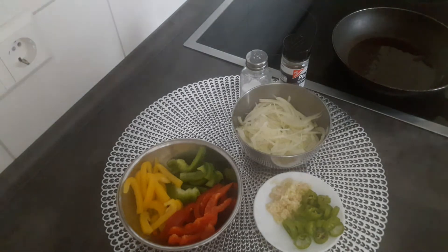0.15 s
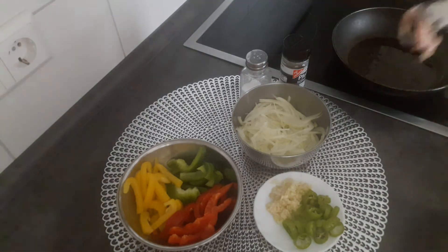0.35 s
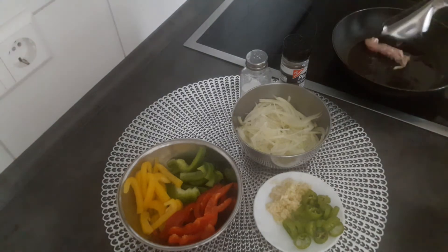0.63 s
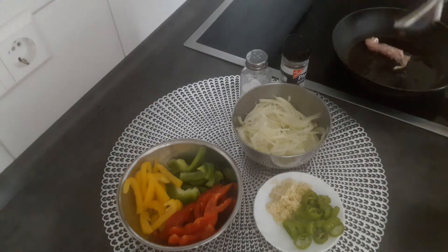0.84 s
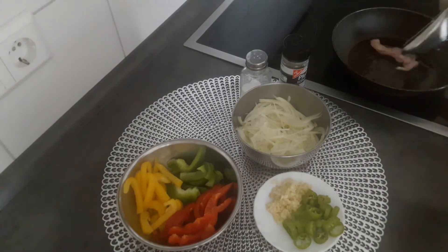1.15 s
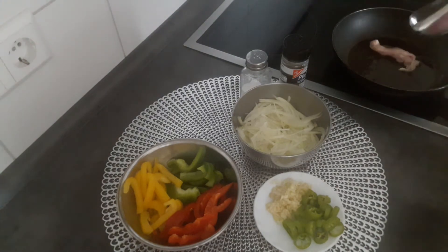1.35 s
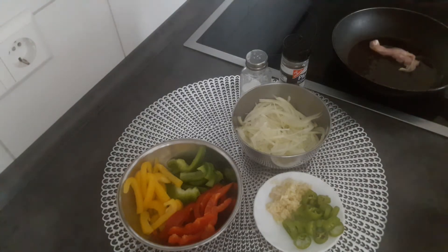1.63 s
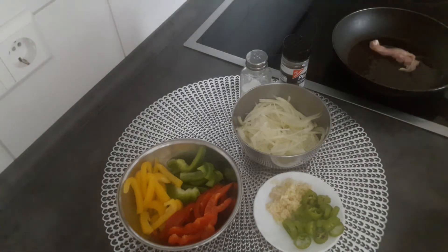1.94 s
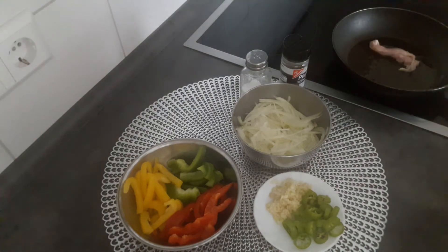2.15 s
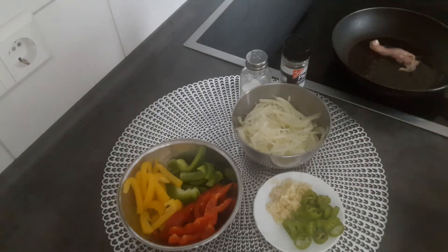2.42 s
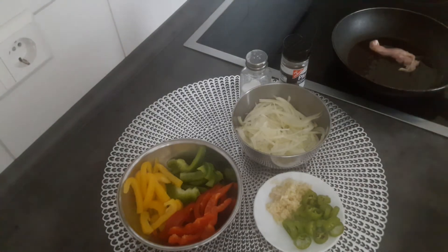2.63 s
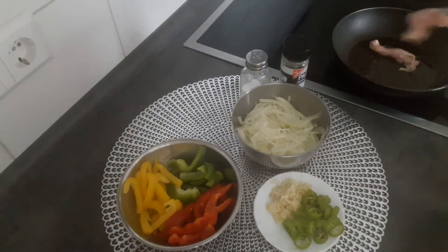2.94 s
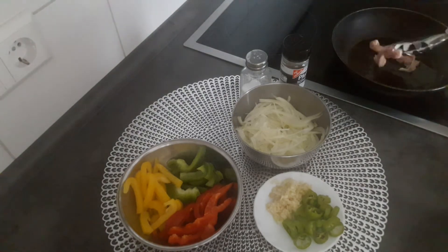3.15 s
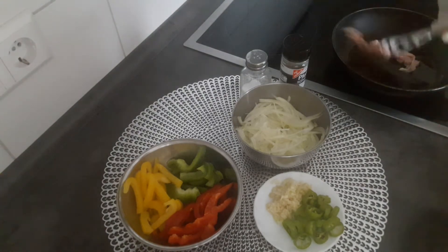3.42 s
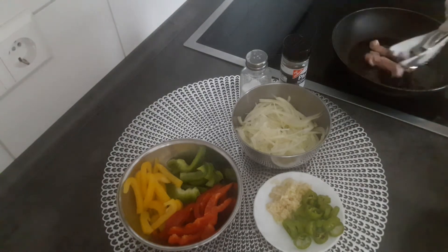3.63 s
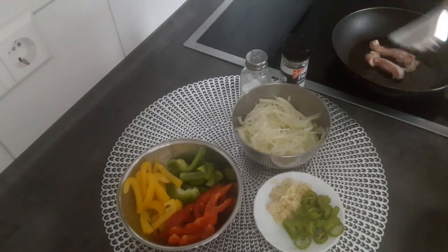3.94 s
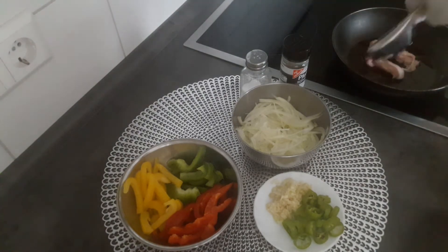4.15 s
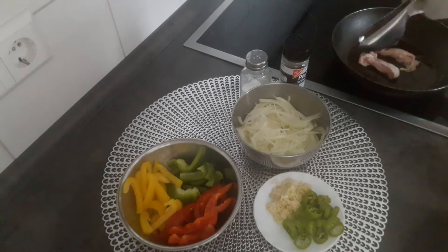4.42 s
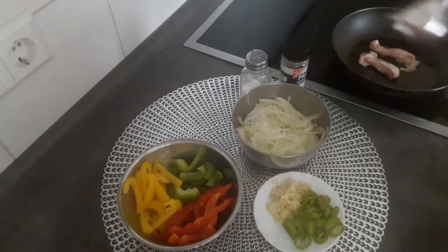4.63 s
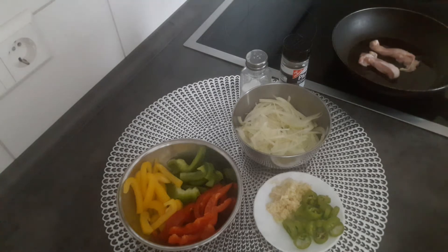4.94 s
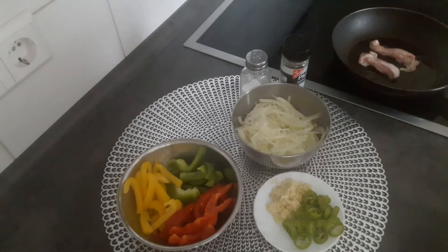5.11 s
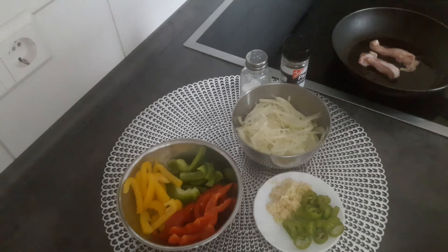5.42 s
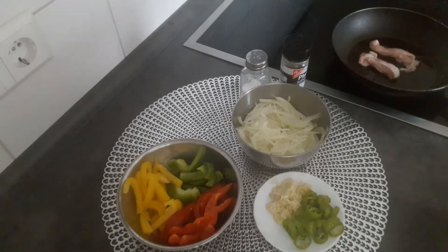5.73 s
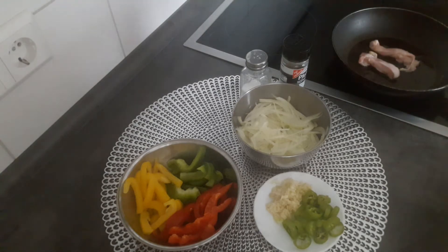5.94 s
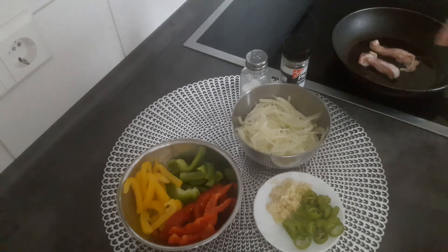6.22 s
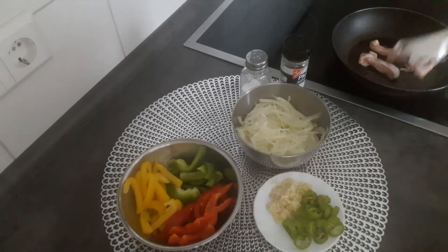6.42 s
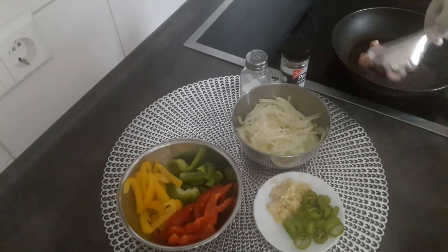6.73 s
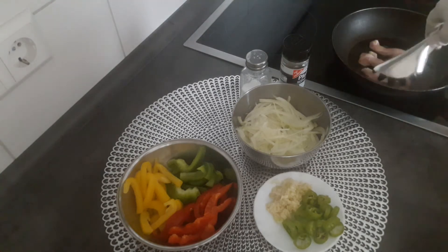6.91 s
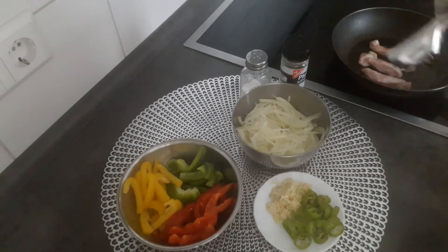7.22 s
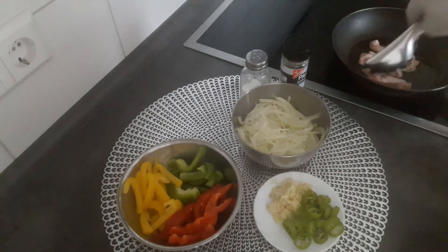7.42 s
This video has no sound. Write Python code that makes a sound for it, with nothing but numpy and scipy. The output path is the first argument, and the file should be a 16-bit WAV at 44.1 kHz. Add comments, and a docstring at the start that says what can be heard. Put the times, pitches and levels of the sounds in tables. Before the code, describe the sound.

A quiet small kitchen with hard surfaces, heard through a close stereo microphone with low room tone and slight hiss. From 0.1 to 0.6 seconds there are faint metallic ticks and scrapes of tongs, then a light bright clink at 0.95. Tiny ticks continue, with a small steel bowl tap at 2.2 and duller faint touches at 2.6 and 3.1. At 3.55 comes the loudest event, a hollow chattering clank on the frying pan with some low hob resonance, trailed by a brief swell of rustle. A sharp ringing tongs clap lands at 4.1. After nearly a second of calm, ticks with dull knocks appear at 5.0 to 5.3, then a clear bowl and tongs clink at 5.5. Another quiet gap leads to a low, heavy thud on the glass hob at 6.9 and a final bright tongs clap at 7.3, fading into short echoes.

```python
"""Steel tongs clap shut and knock a steel bowl and a frying pan on a glass hob in a small hard kitchen.
Each blow is a chattering noise burst that rings the damped modes of the objects it meets.
Between the blows the tongs tick and scrape as they pick up meat: short coloured chatter, some with a dull knock.
Faint noise swells and fades under the handling and after two of the blows, over a quiet room tone;
sparse decaying echoes make the kitchen."""
import sys
import numpy as np
from scipy import signal
from scipy.fft import rfft, irfft
from scipy.io import wavfile
from scipy.ndimage import uniform_filter1d

SR = 44100
rng = np.random.default_rng(int(sys.argv[2]) if len(sys.argv) > 2 else 0)


def inscribe(sig):
    """Save sig as 16-bit PCM at rate SR to the path in sys.argv[1].

    A 1-D sig is mono; a 2-D sig holds one channel per row.
    Samples are clipped to [-1, 1] before scaling.
    """
    pcm = np.round(np.clip(np.atleast_2d(sig).T, -1, 1) * 32767)
    wavfile.write(sys.argv[1], SR, pcm.astype(np.int16))


N = 333837


def gain_of(db):
    """Decibels to a factor."""
    return 10 ** (np.asarray(db) / 20)


def evened(x):
    """Scales to rms 1."""
    return x / np.sqrt(np.mean(x ** 2) + 1e-20)


def read(points, hz):
    """Reads a table along a log-frequency axis."""
    f, value = np.transpose(points)
    return np.interp(np.log(hz + 1), np.log(f + 1), value)


def add(mix, s, sound):
    """Mixes a stereo sound in at a time in seconds."""
    part = mix[:, round(s * SR):][:, :sound.shape[1]]
    part += sound[:, :part.shape[1]]


def causal(db):
    """Minimum-phase response of a gain in dB given from zero to half the sample rate."""
    cepstrum = irfft(np.maximum(db, -100) * np.log(10) / 20)
    cepstrum[1:len(db) - 1] *= 2
    cepstrum[len(db):] = 0
    return irfft(np.exp(rfft(cepstrum)))[:len(db)]


def noise(colour, likeness, patchy_db, flicker_db):
    """Stereo random short-time spectra with drifting patches and a shared flicker, rms 1."""
    frames = N // 256 + 5
    hz = np.fft.rfftfreq(1024, 1 / SR)
    a, b, c, d, patches = rng.standard_normal((frames, 513, 5)).T
    patches = uniform_filter1d(patches, size=12, axis=0)
    patches = evened(uniform_filter1d(patches, size=12, axis=1))
    flicker = evened(uniform_filter1d(rng.standard_normal(frames), size=3))
    same = np.clip(likeness(hz), -1, 1)[:, None]
    left = a + 1j * b
    right = same * left + np.sqrt(1 - same ** 2) * (c + 1j * d)
    level_db = read(colour, hz)[:, None] + patchy_db * patches + flicker_db * flicker
    spectra = np.array([left, right]) * gain_of(level_db)
    return evened(signal.istft(spectra, nperseg=1024, noverlap=768)[1][:, :N])


def room_tone():
    """Room tone and microphone hiss: coloured noise that barely moves, partly alike at both ports."""
    # Colour of the tone. Each row: frequency in Hz, relative density in dB per Hz.
    tone_colour = [(15, -25), (25, -1), (48, -23.5), (130, -0.5), (175, -5.5), (217, -2.5), (293, -4.5),
                   (335, -5), (439, -6), (560, -8.5), (1480, -11.5), (1650, -12.5), (8360, -34.5),
                   (14800, -16.5), (16000, -25)]
    # Left-right likeness of the tone. Each row: frequency in Hz, likeness from -1 to 1.
    tone_likeness = [(60, 0.38), (240, 0.34), (950, -0.084), (3770, 0.13), (15000, -0.74)]
    level_db, left_db = -66.5, -2  # overall rms, left over right
    tone = noise(tone_colour, lambda hz: read(tone_likeness, hz), patchy_db=.8, flicker_db=.5)
    return gain_of(level_db) * tone * gain_of([[left_db / 2], [-left_db / 2]])


def rustle():
    """Faint uneven noise that swells and fades: some swells under handling, two following blows."""
    # Colour of the noise. Each row: frequency in Hz, relative level in dB.
    rustle_colour = [(300, -46), (1000, -19), (2500, -8.5), (6000, -17), (9000, -15), (13000, -18.5),
                     (16000, -32)]
    # Swells of the noise: some under handling, two following the pan hit and a tongs clap.
    # Each row: middle in seconds, half length in seconds, swell above the rest in dB.
    swells = [(0.0, 0.28, 3), (0.835, 0.098, 3.5), (2.095, 0.25, 3.5), (3.097, 0.71, 5), (3.7, 0.15, 14),
              (4.196, 0.19, 9.5), (5.054, 0.45, 4.5), (6.295, .3, 1.5), (7.493, .08, 3.5)]
    t = np.arange(N) / SR
    level_db = np.full(N, -78.0)  # between swells
    for s, half, db in swells:
        level_db += db * np.maximum(1 - abs(t - s) / half, 0)
    return gain_of(level_db) * noise(rustle_colour, np.zeros_like, patchy_db=1.5, flicker_db=2.5)


def tongs_place(s):
    """Left-right dB and left lag in ms at the two ports for where the tongs are at a time."""
    # Spells with the tongs at the pan, else they are at the bowl. Each row: from and to, in seconds.
    over_pan = [(.45, 1.45), (3.0, 4.7), (6.3, 7.6)]
    at_pan, at_bowl = (-1.6, -.18), (-3.5, .2)
    return at_pan if any(a <= s < b for a, b in over_pan) else at_bowl


def heard(sound, left_db, lag_ms, room_db):
    """Direct sound plus sparse echoes of random sign, differing by port, each band dying at its own speed."""
    # Decay time of the kitchen. Each row: frequency in Hz, time to fall 60 dB in seconds.
    room_t60 = [(100, 0.72), (260, 0.39), (700, 0.46), (1840, 0.42), (4850, 0.4), (8000, 0.36),
                (12800, 0.23)]
    size = 28672
    # one echo at a random spot in every 16 samples
    taps = np.zeros((2, size))
    at = np.arange(0, size - 16, 16) + rng.integers(0, 16, (2, size // 16 - 1))
    np.put_along_axis(taps, at, rng.choice([-1., 1.], at.shape), 1)

    hz, t, z = signal.stft(taps, SR, nperseg=512)
    like = np.exp(-(hz / 600) ** 2)[:, None]  # long waves reach both ports alike
    z[1] = like * z[0] + np.sqrt(1 - like ** 2) * z[1]
    decay = gain_of(-60 * t / read(room_t60, hz)[:, None])
    tail = signal.istft(z * decay, SR, nperseg=512)[1][:, :size]

    t = np.arange(size) / SR
    # counter and walls answer first and strongest
    tail *= (1 - np.exp(-t / 0.00039)) * (1 + 2.92 * np.exp(-t / 0.0043))
    path = gain_of(room_db) * tail / np.linalg.norm(tail, axis=1, keepdims=True)
    lag = round(lag_ms * SR / 1000)
    path[[0, 1], [max(lag, 0), max(-lag, 0)]] += 1  # the nearer port hears the direct sound first

    # smooth the response of each port over some tens of Hz so the echoes sound evenly coloured
    for port in (0, 1):
        power = uniform_filter1d(abs(rfft(path[port])) ** 2, size=56)
        lumps_db = 10 * np.log10(power[::14])
        path[port] = signal.oaconvolve(path[port], causal(lumps_db.mean() - lumps_db))[:size]
    balance = gain_of([[left_db / 2], [-left_db / 2]])
    return signal.fftconvolve(sound[None], path, axes=1) * balance


def pressure(length):
    """How hard two things press during a touch of some milliseconds: quick swell, abrupt release."""
    u = np.arange(2048) / SR / np.clip(length, .0005, .03)
    return u ** 0.98 * np.exp(-(1.8 * u) ** 2.32)


def contact(length):
    """Metal chatters on metal: noise that follows the pressure and holds every pitch alike, energy 1."""
    force = rng.standard_normal(2048)
    # shape in time and flatten in pitch by turns, until both nearly hold
    for _ in range(8):
        envelope = np.sqrt(abs(uniform_filter1d(force ** 2, size=24)) + 1e-12)
        spectrum = rfft(force / envelope * pressure(length))
        force = irfft(spectrum / (abs(spectrum) + 1e-12))
    return force


def ring(modes, hardness_db=0):
    """Decaying sines of one struck object, energy 1; each blow lands on the modes a little differently."""
    hz, width, db = np.transpose(modes)[:, :, None]
    t = np.arange(8192) / SR
    db = db + hardness_db * np.log2(hz / 4000) + rng.standard_normal(hz.shape)
    swing = gain_of(db) * width * np.exp(-np.pi * width * t)  # a wide peak of equal height starts stronger
    sines = np.sin(2 * np.pi * (hz * t + rng.random(hz.shape)))
    out = (swing * sines).sum(0) * np.minimum(t / 0.0006, 1)
    return out / np.linalg.norm(out)


def tick(db, centre_hz, knock_db, left_db, lag_ms, room_db):
    """A light touch: brief chatter spread over octaves around a centre, high ones thinner; some knock dully."""
    # Damped low modes of a dull knock, perhaps of the bowl.
    # Each row: frequency in Hz, width in Hz, relative height of the peak in dB.
    knock_modes = [(1170, 180, 1), (1365, 210, 0), (1570, 300, -4)]
    contact_s = 0.0051
    spread_octaves, narrowing = 3.03, 1  # spread at 4 kHz, octaves lost per octave higher
    hz = np.linspace(1, SR / 2, 1025)
    octaves = max(spread_octaves - narrowing * np.log2(centre_hz / 4000), .3)
    distance = np.log2(hz / centre_hz) / (octaves / 2)
    colour = causal(-10 * np.log10((1 + distance ** 4) * (hz + 500)))

    force = contact(contact_s)
    chatter = signal.fftconvolve(force, colour)
    knock = signal.fftconvolve(force, ring(knock_modes)[:len(colour)])
    sound = gain_of(db) * chatter / abs(chatter).max() + gain_of(knock_db) * knock / abs(knock).max()
    return heard(sound, left_db, lag_ms, room_db)


def blow(tongs_db, pan_db, bowl_db, hob_db, click_db, length, hardness_db, *place_and_room):
    """One chattering contact rings the tongs and whatever they meet, each object a bank of damped modes."""
    # Modes of each object. Each row: frequency in Hz, width in Hz, relative height of the peak in dB.
    tongs_modes = [(2650, 90, -13), (2860, 80, -6), (3310, 70, -12), (3750, 120, -17), (4290, 90, -16),
                   (4745, 55, 2), (5110, 75, -5), (5400, 140, -18), (6300, 160, -17), (6770, 100, -18),
                   (7400, 130, -12), (7810, 110, -13), (9850, 110, -17), (10700, 100, -21),
                   (11400, 140, -17), (11920, 110, -17), (12600, 150, -18), (13900, 180, -23),
                   (15350, 200, -20)]
    pan_modes = [(65, 25, -12), (124, 14, -1), (432, 28, -7), (540, 50, -14), (660, 60, -17),
                 (820, 80, -14), (910, 60, -8), (1035, 60, 0), (1240, 120, -11), (1430, 80, -3),
                 (1530, 90, -2), (1800, 200, -13), (2200, 70, -4), (2450, 200, -14), (2870, 90, -15),
                 (3080, 60, -7), (3175, 60, -5), (3345, 60, -6), (3810, 150, -16), (4550, 200, -17),
                 (5150, 200, -16), (5600, 300, -20), (6400, 400, -22), (7420, 200, -21), (8080, 130, -9),
                 (10600, 500, -26)]
    bowl_modes = [(1240, 80, -14), (1400, 80, -17), (1870, 60, -9), (2300, 70, -13), (2640, 120, 0),
                  (3050, 140, -7), (3580, 70, -12), (3790, 90, -11), (6200, 130, -13), (6780, 80, -15),
                  (7340, 110, -9)]
    hob_modes = [(82, 15, -20), (135, 10, -6), (199, 12, -5), (266, 14, -1), (317, 11, -3), (386, 14, -9),
                 (431, 18, -14), (506, 30, -19), (660, 40, -23), (950, 60, -25), (1230, 50, -26),
                 (1900, 500, -26), (2840, 300, -25), (3650, 400, -25), (6200, 300, -24), (7150, 450, -21),
                 (10400, 500, -22), (11500, 700, -22)]
    hz = np.linspace(0, SR / 2, 2049)
    click = causal(hardness_db * np.log2((hz + 300) / 4000) - 40 * np.exp(-hz / 500))

    body = gain_of(tongs_db) * ring(tongs_modes, hardness_db)
    body += gain_of(pan_db) * ring(pan_modes)
    body += gain_of(bowl_db) * ring(bowl_modes)
    # the heavy top takes 12 ms to swing fully
    yielding = .4 + .6 * np.minimum(np.arange(len(body)) / SR / .012, 1)
    body += gain_of(hob_db) * ring(hob_modes) * yielding
    body[:len(click)] += gain_of(click_db) * click / np.linalg.norm(click)

    span = np.sqrt(.01 * SR)  # levels are rms values over 10 ms
    return heard(span * signal.fftconvolve(body, contact(length)), *place_and_room)


def scene():
    """Rustle, blows and ticks, each touch heard from where the tongs are."""
    # Blows of the tongs. Each row: start in seconds, levels in dB of tongs, pan, bowl, hob and bare click,
    # contact time in seconds, hardness (treble tilt of tongs and click) in dB per octave, room echo in dB.
    blows = [(0.9543, -48.5, -69, -55, -90, -55.5, 0.0062, -1.5, 6.5),
             (2.1624, -63.5, -99, -52.5, -97, -56, 0.0041, 0.5, -3),
             (2.59, -70, -99, -61, -72, -57.5, 0.0052, -5.5, 7),
             (3.064, -66, -58, -99, -66.5, -56, 0.0046, -6, 5),
             (3.55, -51, -25.5, -99, -44, -35.5, .012, -4.5, 1.5),
             (3.683, -63, -66, -99, -64.5, -50, 0.0071, -6, 5),
             (4.0821, -36.5, -56, -99, -76, -48, 0.0073, -2.5, 4.5),
             (5.4935, -43.5, -99, -39, -91, -41, 0.0038, -0.5, -2),
             (6.906, -64.5, -73, -99, -32.5, -42, 0.0095, 0.5, 5.5),
             (6.918, -89.5, -90, -99, -38.5, -62, 0.011, -5, 8.5),
             (7.324, -35.5, -56.5, -99, -68, -45.5, 0.0091, -2, 3.5)]
    # Small ticks. Each row: start in seconds, peak level in dB, centre in Hz, dull knock in dB, room echo in dB.
    ticks = [(0.121, -60.5, 4300, -99, 11.5), (0.3575, -57, 4640, -99, 10), (0.407, -56.5, 4670, -99, 8.5),
             (0.469, -59.5, 4420, -99, 6), (0.5253, -53.5, 3200, -59.5, 6),
             (0.6092, -58.5, 3400, -74, 13.5), (1.238, -64, 5810, -99, 12),
             (1.2655, -53.5, 2900, -61, 10.5), (1.5862, -64.5, 5950, -99, 11),
             (1.605, -59.5, 6040, -99, 10.5), (1.851, -65, 6450, -99, 11.5), (1.9282, -56.5, 3000, -61, 4),
             (2.0582, -64.5, 4500, -99, 11), (2.1975, -53, 2620, -61, 1), (2.341, -55, 9900, -99, 5),
             (2.374, -56, 6330, -99, 2), (2.39, -59.5, 5930, -99, 8.5), (2.708, -60, 4200, -99, 9),
             (2.8566, -61, 4440, -99, -7), (3.837, -60, 3560, -99, 1.5), (3.9561, -50.5, 3280, -67, 2.5),
             (4.03, -63, 5450, -99, 2), (5.0137, -51.5, 3410, -67.5, 12), (5.146, -46.5, 4230, -57.5, 3.5),
             (5.207, -61, 3010, -99, 4), (5.259, -57, 3700, -63, 8)]
    mix = rustle()
    for s, *row, room_db in blows:
        add(mix, s, blow(*row, *tongs_place(s), room_db))
    for s, *row, room_db in ticks:
        add(mix, s, tick(*row, *tongs_place(s), room_db))
    return mix


def record(dry):
    """Microphone colour, its noise floor, the band limit and a steady bias of the converter."""
    # Colour of the microphone. Each row: frequency in Hz, gain in dB.
    mic_colour = [(60, -2.5), (1000, 6.5), (4000, 5.5), (7800, 7.5), (8600, 1.5), (10200, 3.5),
                  (12000, 8.5), (16000, 0)]
    edge_hz, bias = 16150, -.0004
    colour = causal(read(mic_colour, np.linspace(0, SR / 2, 1025)))
    wet = signal.oaconvolve(dry, colour[None])[:, :N] + room_tone()
    band_limit = signal.firwin(511, edge_hz, window=("kaiser", 9), fs=SR)
    return bias + signal.oaconvolve(wet, band_limit[None], "same")


dry = scene()
out = record(dry)
inscribe(out)
```